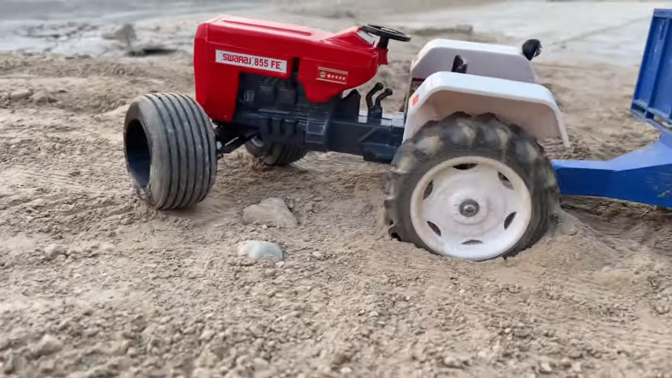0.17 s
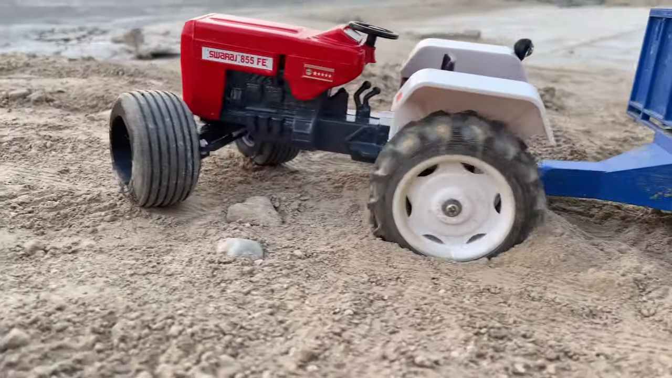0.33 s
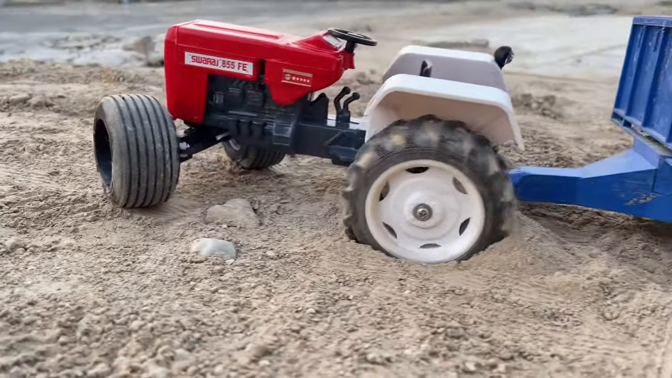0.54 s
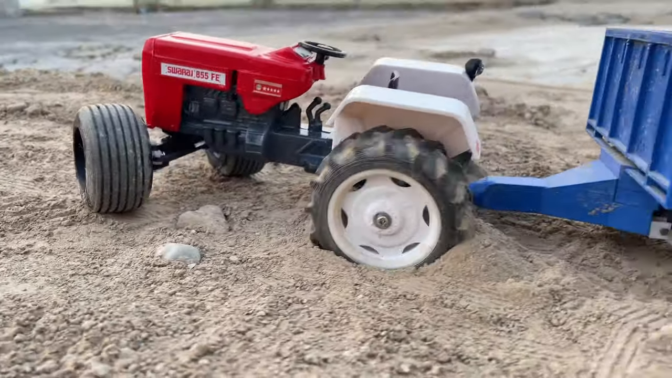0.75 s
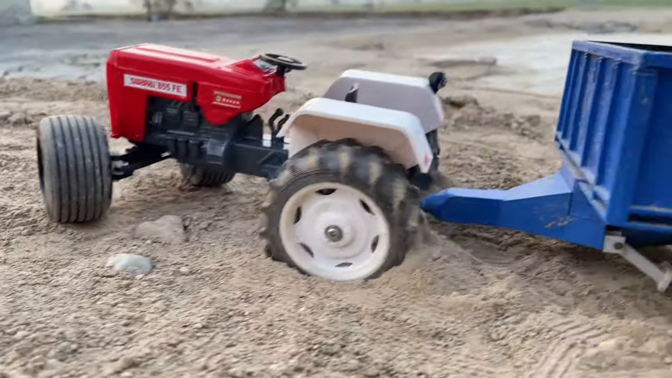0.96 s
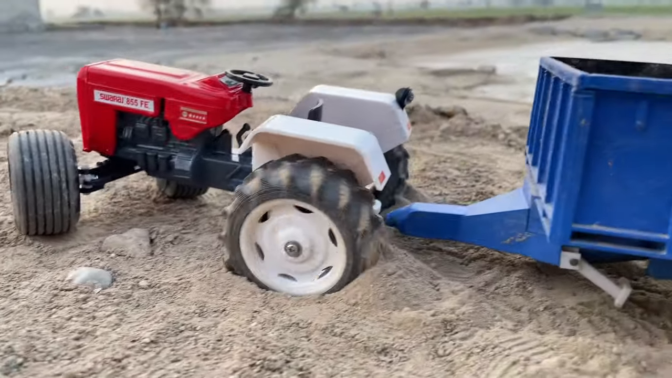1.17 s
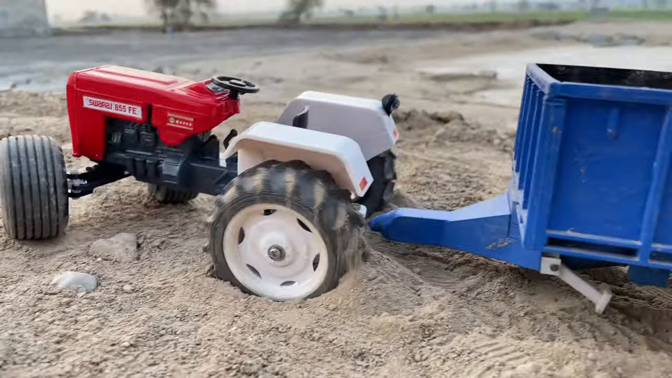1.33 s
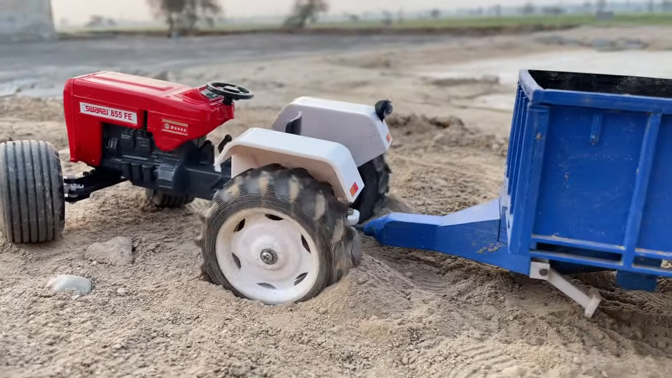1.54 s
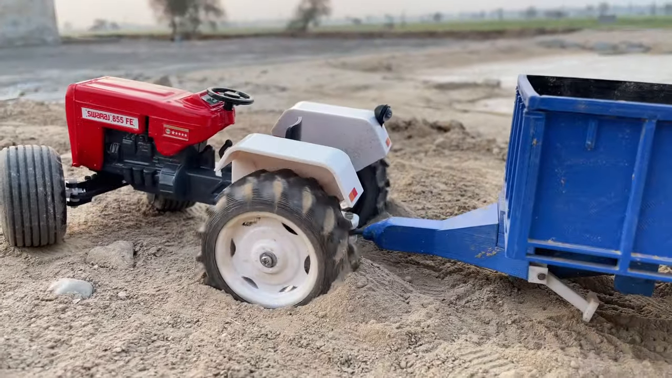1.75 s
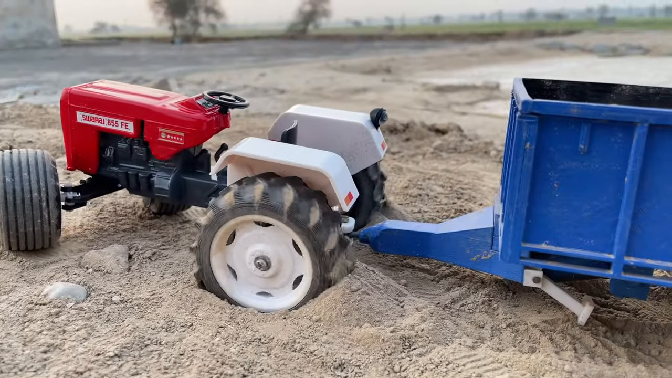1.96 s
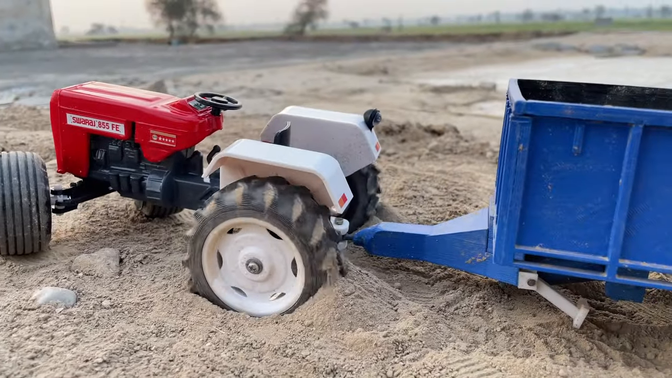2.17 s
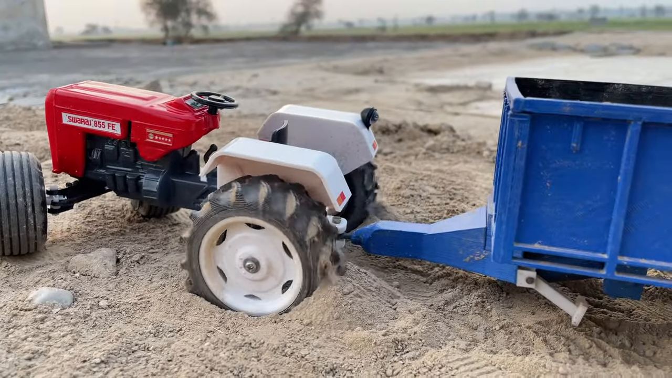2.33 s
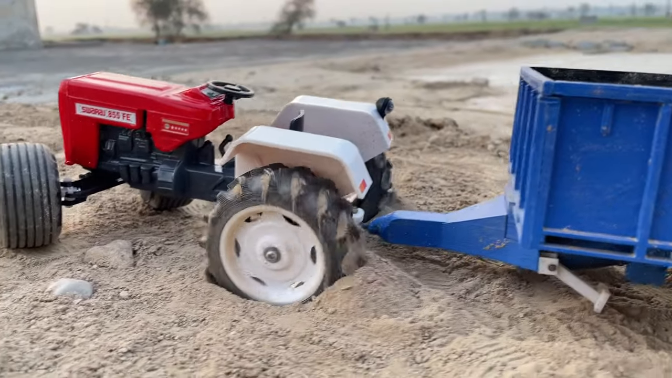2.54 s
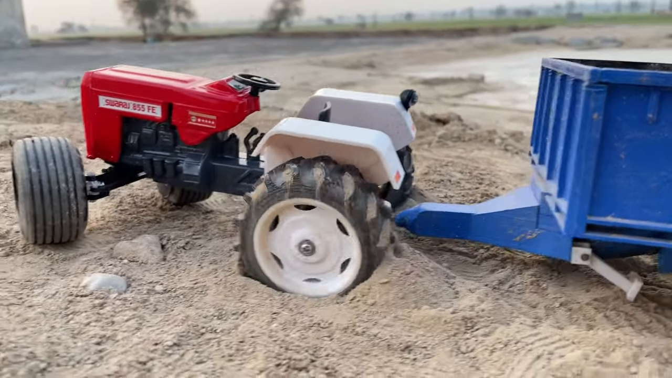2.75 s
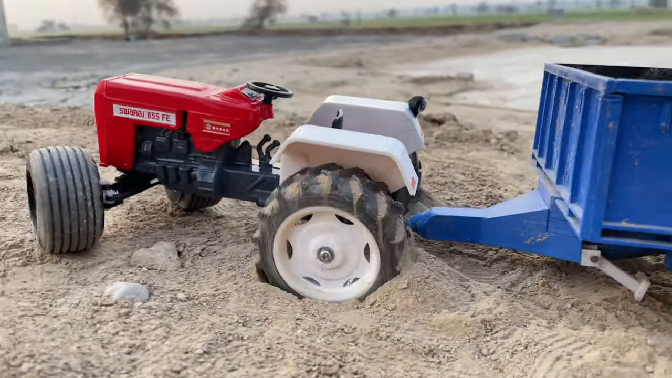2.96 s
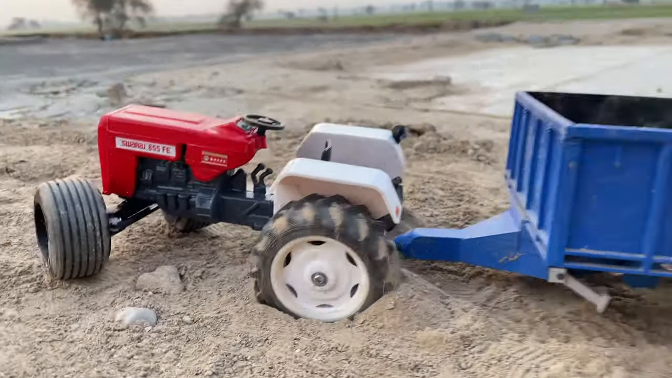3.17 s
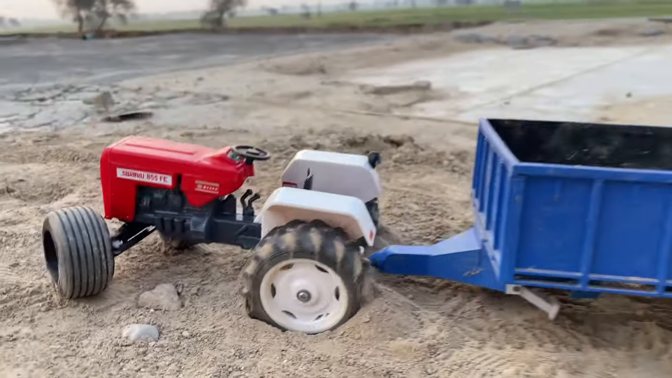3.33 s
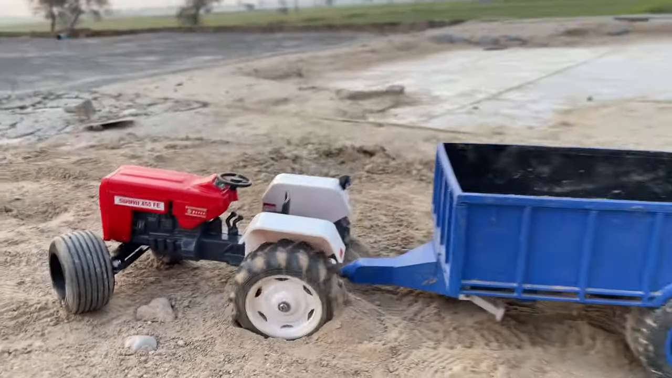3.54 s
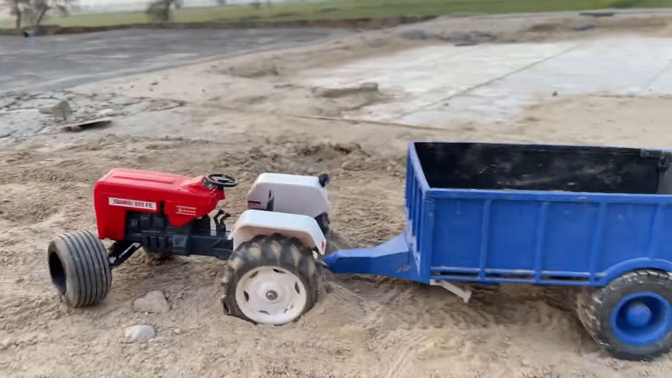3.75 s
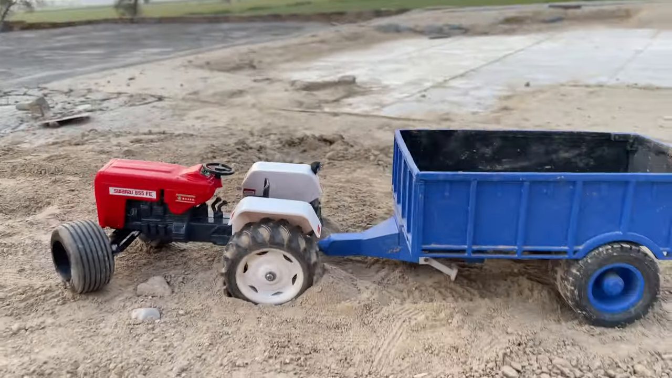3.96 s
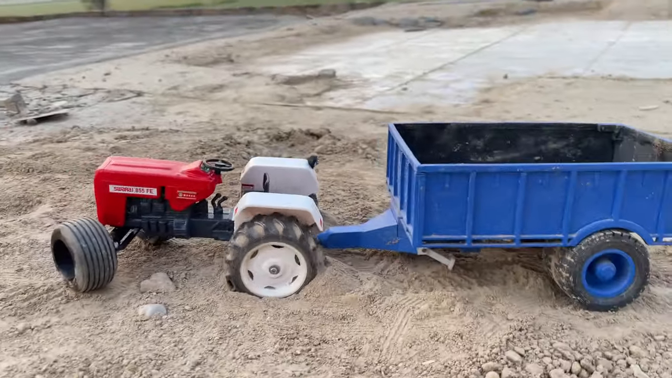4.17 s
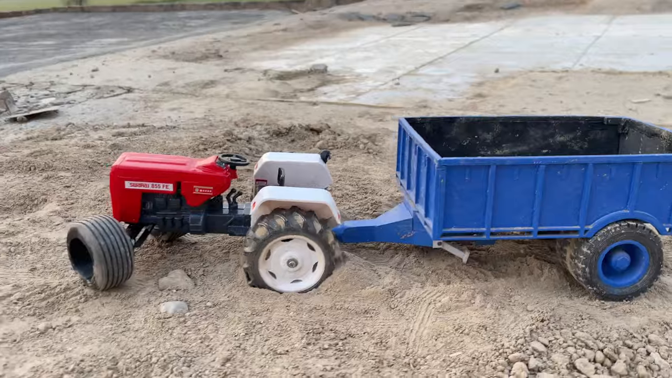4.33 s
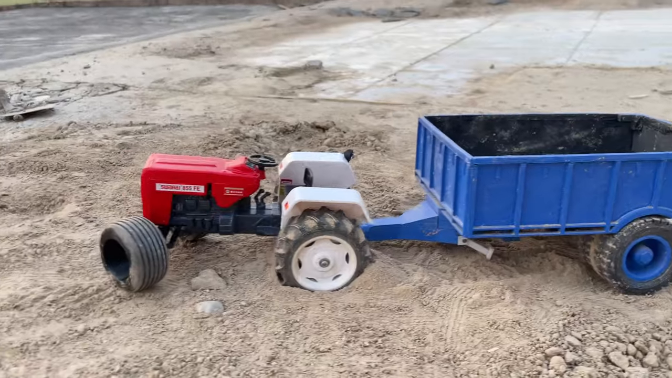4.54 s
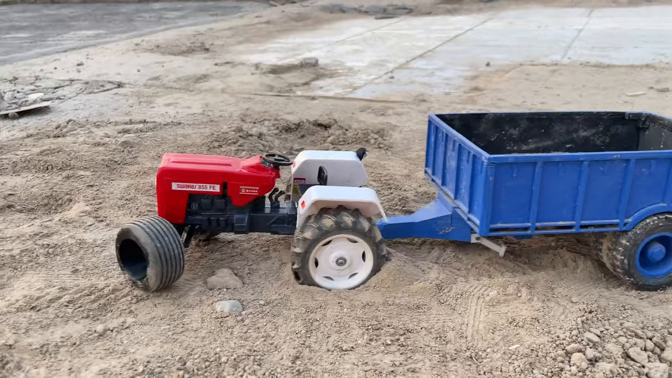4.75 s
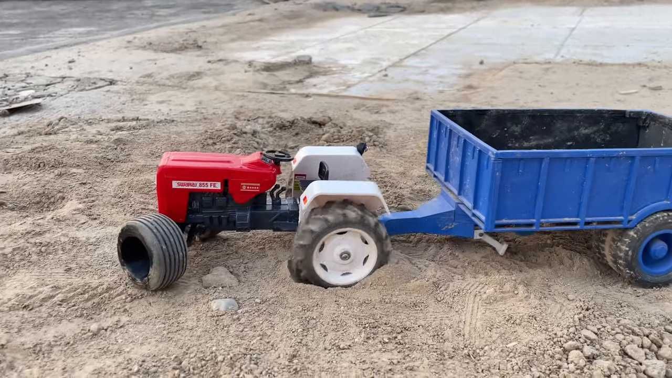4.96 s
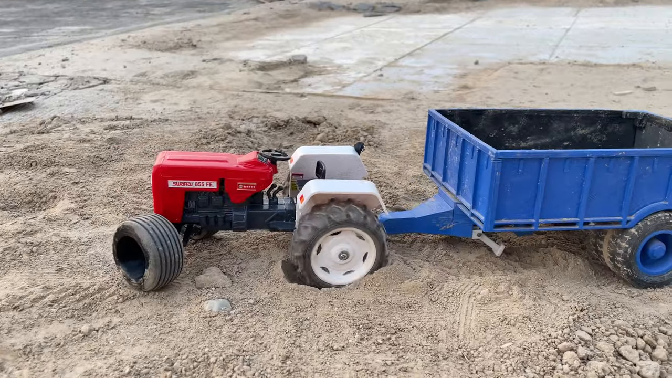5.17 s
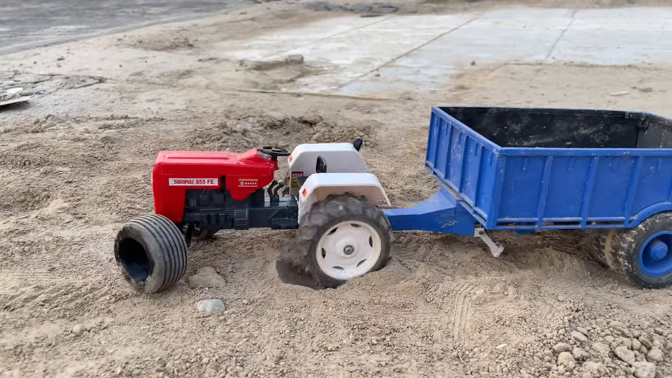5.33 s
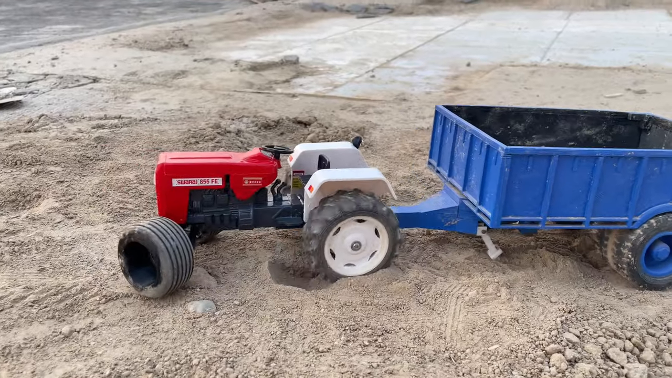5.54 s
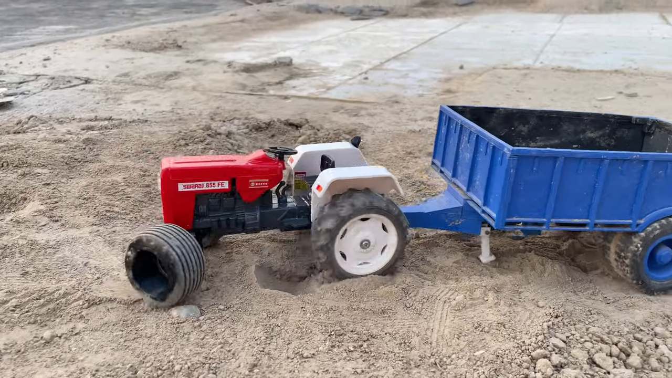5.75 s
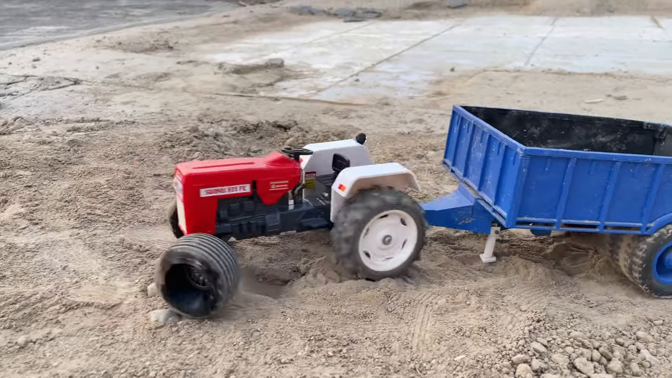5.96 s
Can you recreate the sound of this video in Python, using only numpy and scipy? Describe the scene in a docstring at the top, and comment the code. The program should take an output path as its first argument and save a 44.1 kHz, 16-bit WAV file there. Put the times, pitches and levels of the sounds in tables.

```python
"""Over open ground with light wind rumble, one gust, a far engine's hum and field noise, a toy tractor pulls in sand.
Its motor and plastic gears grind as noise swelling at each tooth, snagging a dozen times a second, with grit pings.
It bogs down, stops with a clack of gear play, clicks over and restarts faster, with a clearer whine of sine tones.
Resonances of shell, gears and chassis colour the toy; two ports hear it with different phase."""
import sys
import numpy as np
from scipy import signal
from scipy.fft import rfft, irfft, next_fast_len
from scipy.io import wavfile

SR = 44100
rng = np.random.default_rng(int(sys.argv[2]) if len(sys.argv) > 2 else 0)


def transcribe(signal):
    """Save signal, clipped to [-1, 1], as a 16-bit WAV file at the path in sys.argv[1]."""
    frames = np.atleast_2d(signal).T
    limited = np.clip(frames, -1, 1)
    pcm = np.round(limited * 32767).astype(np.int16)
    wavfile.write(sys.argv[1], SR, pcm)


N = 268877
T = np.arange(N) / SR
SIZE = next_fast_len(N + SR // 4)  # room for ringing tails
HZ = np.maximum(np.fft.rfftfreq(SIZE, 1 / SR), 1)
ON_S = 4.846  # motor power returns
AGAIN = T >= ON_S


def from_db(db):
    """Gain of a level in dB."""
    return 10 ** (np.asarray(db) / 20)


def rms_one(x):
    """Scaled to rms 1."""
    return x / np.sqrt(np.mean(x ** 2) + 1e-20)


def in_time(rows):
    """Columns of a curve at every sample."""
    s, *columns = np.transpose(rows)
    return [np.interp(T, s, column) for column in columns]


def on_hz(rows):
    """Columns of a spectrum table at every FFT bin, joined along log frequency."""
    hz, *columns = np.transpose(rows)
    return [np.interp(np.log(HZ), np.log(hz), column) for column in columns]


def drift(rate_hz):
    """Slow random wander of rms 1: noise through two equal one-pole lowpasses, settled for a second."""
    pole = np.exp(-2 * np.pi * rate_hz / SR)
    wander = signal.lfilter([1], [1, -2 * pole, pole * pole], rng.standard_normal(N + SR))
    return rms_one(wander[SR:])


def bumps(rows, width_s):
    """Sum of smooth Gaussian bumps, one per (time, height) row."""
    s, height = np.transpose(rows)
    marks = np.bincount(np.clip(s * SR, 0, N - 1).astype(int), height, N)
    t = np.arange(-SR // 10, SR // 10 + 1) / SR
    return signal.fftconvolve(marks, np.exp(-.5 * (t / width_s) ** 2), "same")


def resonances(hz, width_hz, db):
    """Parallel causal resonances with alternating signs; white noise of rms 1 leaves with rms 1."""
    total = 0
    for k, (f, w, d) in enumerate(zip(hz, width_hz, db)):
        total = total + (-1) ** k * from_db(d) * 1j * HZ * w / (f * f - HZ ** 2 + 1j * HZ * w)
    return total / np.sqrt(np.mean(np.abs(total) ** 2))


def coloured(spectrum, alike):
    """Stereo noise of a spectrum, rms 1; alike sets how much the two sides share."""
    noise = rfft(rng.standard_normal((2, SIZE))) * from_db(on_hz(spectrum)[0])
    mid, side = irfft(noise, SIZE)[:, :N]
    alike = np.clip(alike, 0, 1)
    return rms_one(np.sqrt(1 + alike) * mid + np.sqrt(1 - alike) * side * np.array([[1], [-1]]))


def field():
    """Far open-air noise, steady and wide."""
    # field colour: (frequency [Hz], relative density [dB per Hz])
    field_colour = [(88, -20), (150, -2), (225, -7.5), (260, -5), (336, -7), (476, -7.5), (713, -17),
                    (8630, -40), (12000, -60), (15600, -98), (22000, -120)]
    return from_db(-51) * coloured(field_colour, alike=0.34)


def far_engine():
    """Hum at multiples of a far engine's firing rate; pitch and levels wander slowly."""
    firing_hz = 24.6
    # steady tones: (multiple of firing rate, middle level [dB])
    steady = [(2, -48.5), (3, -52), (5, -54)]
    # fourth multiple, coming and going on the wind: (time [s], middle level [dB])
    fourth = [(0, -53), (.4, -38), (.7, -46), (.95, -52), (1.3, -38), (1.8, -48), (2.15, -58),
              (2.55, -39.5), (3.4, -47), (3.8, -56), (5.4, -60), (5.7, -44), (6.1, -43)]
    turns = np.cumsum(firing_hz + .25 * drift(3.45)) / SR
    hum = 0
    for k, db in [*steady, (4, in_time(fourth)[0])]:
        hum = hum + from_db(db + 2.3 * drift(3.3)) * np.sin(2 * np.pi * round(k) * turns)
    return hum


def wind():
    """Lumpy low rumble of moving air, with one deep gust."""
    # rumble: (time [s], middle level [dB])
    rumble_level = [(0, -43.5), (.35, -39), (.8, -37), (1.2, -40), (1.6, -38), (1.95, -40.5), (2.7, -38),
                    (3.5, -42), (4.7, -45), (5.5, -46.5), (6.1, -46)]
    # rumble colour: (frequency [Hz], relative density [dB per Hz])
    rumble_colour = [(12, -43), (20, -56), (45, 0), (87, -0.5), (109, -1.5), (156, -13.5), (211, -16.5),
                     (400, -22), (520, -85), (880, -120)]
    # gust colour: (frequency [Hz], relative density [dB per Hz])
    gust_colour = [(25, -40), (45, -2), (70, 0), (90, -14), (140, -50)]
    gust_s, gust_db, gust_width_s, lumps_db = 1.044, -31, 0.059, 1.5
    rumble_db = in_time(rumble_level)[0] + lumps_db * drift(3.6)
    rumble = from_db(rumble_db) * coloured(rumble_colour, alike=.9)
    gust_shape = from_db(gust_db) * np.exp(-.5 * ((T - gust_s) / gust_width_s) ** 2)
    return rumble + gust_shape * coloured([(1, -120), *gust_colour, (400, -120)], alike=.9)


def air():
    """Everything around the toy: wind, far engine and open field."""
    return wind() + far_engine() + field()


def bursts(rows, first_db):
    """Each contact is a firm click, then decaying noise chatter; spectra of three draws."""
    chatter, first = np.zeros(N), np.zeros(N)
    for s, db, ms in rows:
        chatter += from_db(db) * (T >= s) * np.exp(-np.maximum(T - s, 0) * 1000 / ms)
        first[round(s * SR)] = from_db(db + first_db) / ms  # firmer in short bursts
    draws = chatter * rng.standard_normal((3, N))
    draws[0] += first
    return rfft(draws, SIZE)


def clacks():
    """Gear play knocks the whole toy; grit pings some upper modes only."""
    # grit caught in the gears: (time [s], drive level [dB], decay [ms])
    grit = [(0.0775, -24, 1.3), (1.5377, -38, 1.5), (1.8105, -33, 1.2), (2.369, -32, 1.5),
            (3.0785, -31, 1.2), (3.092, -33, 2), (3.104, -34, 1.5), (3.268, -34, 1.5), (3.402, -31, 1.2),
            (3.7993, -30, 1.26)]
    # gear play taken up at the stop: (time [s], drive level [dB], decay [ms])
    stop_contacts = [(4.4981, -20, 2), (4.5003, -23, 3), (4.5234, -43, 4), (4.5424, -52, 5)]
    # gear play taken up at the switch-over: (time [s], drive level [dB], decay [ms])
    switch_contacts = [(4.7349, -30, 1), (4.7358, -16, 1.6), (4.7385, -31, 2.5), (4.7567, -53, 9),
                       (4.7695, -47, 5), (4.8466, -40, 1.1)]
    # what the clacks ring: (frequency [Hz], width [Hz], stop level [dB], switch-over level [dB])
    clack_modes = [(830, 130, -2, -6), (1050, 250, 2, -18), (1590, 380, -5, 4), (2400, 450, -6, -13),
                   (2920, 300, -6, -15), (3450, 400, -4, -10), (4220, 320, -8, -13), (4850, 400, -7, -19),
                   (5800, 500, -10, -23), (6600, 500, -11, -27), (7600, 800, -11, -27),
                   (9700, 2000, -18, -26), (12500, 1200, -18, -28)]
    low_hz = 600  # too small a body to thud below this
    hz, width_hz, stop_db, switch_db = np.transpose(clack_modes)
    upper = slice(3, 10)
    knocks = bursts(stop_contacts, first_db=19) * resonances(hz, width_hz, stop_db)
    knocks += bursts(switch_contacts, first_db=27) * resonances(hz, width_hz, switch_db)
    knocks += bursts(grit, first_db=11) * resonances(hz[upper], width_hz[upper], stop_db[upper])
    low_cut = signal.butter(3, low_hz, "high", fs=SR, output="sos")
    return knocks * signal.sosfreqz(low_cut, HZ, fs=SR)[1]


def snags():
    """Drop in dB before each part's share: a smooth dip at each lug, deeper at the hard snags."""
    # tyre lugs biting the sand in the first pull, one snag each: (time [s], lugs passed [count])
    lug_passes = [(.052, 0), (.54, 6), (.969, 11), (1.272, 15), (1.738, 21), (2.464, 30), (2.963, 36),
                  (3.494, 42), (3.705, 45), (4.095, 50)]
    # hard snags: (time [s], further drop [dB])
    hard_snags = [(.052, 3), (0.318, 3), (0.457, 3), (0.711, 3.5), (0.967, 3.5), (1.207, 1.5), (1.352, 2),
                  (1.739, 3), (1.98, 3), (2.315, 3), (2.628, 5), (2.716, 2), (2.963, 2.5), (3.229, 3),
                  (3.624, 2), (4.094, 2), (5.261, 2.5)]
    drop_db, spread_db, jitter_s, snag_s = 3, 1.16, .004, .014
    s, passed = np.transpose(lug_passes)
    lug = np.arange(passed[-1] + 1)
    chance = rng.standard_normal((len(lug), 2))
    lug_s = np.interp(lug, passed, s) + jitter_s * chance[:, 0]
    lug_db = drop_db + spread_db * chance[:, 1]
    return bumps([*zip(lug_s, lug_db), *hard_snags], snag_s)


def stall():
    """Depth 0-1 of the bogging just before the stop: sinks quickly, recovers more slowly."""
    deepest_s, sink_s, recover_s = 4.285, .03, .08
    return np.exp(-.5 * ((T - deepest_s) / np.where(T < deepest_s, sink_s, recover_s)) ** 2)


def power():
    """Motor gain: full, a fast run-down and fainter coasting after the cut, then on with a surge."""
    off_s, run_down_s, coast_db, coast_s = 4.503, 0.006, -20, 0.028
    on_rise_s, surge_db, surge_s = 0.0019, 4, 0.03
    off, on = np.maximum(T - off_s, 0), np.maximum(T - ON_S, 0)
    dying = np.exp(-off / run_down_s) + from_db(coast_db) * np.exp(-off / coast_s)
    dying /= 1 + from_db(coast_db)
    return dying + (1 - np.exp(-on / on_rise_s)) * from_db(surge_db * np.exp(-on / surge_s))


def shell_swells():
    """Rise in dB where the shell briefly rings up."""
    # swells: (time [s], rise [dB])
    ring_ups = [(.1, 4), (.166, 5), (.245, 5), (.85, 5), (1.18, 5), (1.47, 4), (1.7, 4), (2.1, 5),
                (3.73, 5), (4.055, 8), (4.077, 4), (4.206, 7), (4.451, 9), (5.235, 7)]
    return bumps(ring_ups, .005)


def gear_turns(pull_per_s, restart_per_s, bog, drop):
    """Tooth contacts passed: the bogging and each snag slow the gears, which then pick up again."""
    bog_slowing, slowing_per_db, recovery_s = .36, .024, .02
    pull_per_s = pull_per_s * (1 - bog_slowing * bog) * (1 + .02 * drift(40))
    speed = np.where(AGAIN, restart_per_s, pull_per_s)
    keep = np.exp(-1 / (recovery_s * SR))
    held = signal.lfilter([1 - keep], [1, -keep], drop)
    held -= held[~AGAIN].mean() * ~AGAIN  # the first pull keeps its mean speed
    unsteady = .014 * drift(50) + .008 * drift(9)
    return np.cumsum(speed * (1 - slowing_per_db * held + unsteady)) / SR


def meshing(turns, sharp, knock):
    """Three unrelated draws of friction noise swelling at each tooth; the first adds one uneven knock a tooth."""
    gate = np.exp(sharp * (np.cos(2 * np.pi * turns) - 1))
    teeth = np.diff(np.floor(turns + .5), prepend=0) > 0
    draws = rms_one(gate * rng.standard_normal((3, N)))
    draws[0] += knock * rms_one(teeth * from_db(3 * rng.standard_normal(N)))
    return draws


def gear_whine(turns, restart_per_s, swell_db):
    """The mesh sings at multiples of the tooth rate, with wandering level and blurred phase."""
    # multiples 1-5: (base level [dB], share of the swells [ratio], phase blur [rad])
    multiples = [(-64, .3, .9), (-45, .5, 1.2), (-36, 1, .7), (-52, .4, .8), (-56, .4, 1.2)]
    # shell and gearbox lift any multiple in their range: (lift [dB], centre [Hz], width [Hz])
    lifts = [(12, 1490, 150), (7, 1880, 170)]
    whine = 0
    for k, (db, share, blur) in enumerate(multiples, 1):
        level_db = db + share * swell_db + 3.9 * drift(42.9)
        for up_db, hz, width_hz in lifts:
            level_db = level_db + up_db * np.exp(-((k * restart_per_s - hz) / width_hz) ** 2)
        whine = whine + from_db(level_db) * np.sin(2 * np.pi * k * turns + blur * drift(35))
    return whine


def motor():
    """Spectra of three draws: teeth excite each part of the toy; on the restart the mesh also sings."""
    # first pull: (time [s], tooth contacts before slowing [per s], shell level [dB], sizzle level [dB])
    pull = [(0, 294, -30, -34.5), (.1, 340, -30, -34.5), (.3, 321, -29, -36.5), (.5, 317, -31, -34),
            (.75, 300, -32, -37.5), (1.05, 338, -30.5, -35.5), (1.3, 338, -30.5, -30.5),
            (1.55, 360, -31.5, -34), (1.8, 348, -30, -32.5), (2.05, 314, -31.5, -36), (2.42, 333, -32, -33),
            (2.65, 318, -32, -34.5), (3.05, 296, -34, -38.5), (3.3, 296, -30.5, -38),
            (3.6, 345, -32.5, -33), (3.85, 338, -33.5, -38.5), (4.2, 359, -32.5, -39.5),
            (4.5, 300, -32, -38)]
    # the listening angle moves in the first pull:
    # (time [s], gearbox level [dB], idler level [dB], chassis level [dB])
    angle = [(0, -30.5, -58, -39.5), (.35, -30.5, -47, -39), (.55, -32, -50, -38.5),
             (0.851, -32, -46.5, -39), (1.301, -34.5, -39.5, -37.5), (1.998, -35.5, -41.5, -40.5),
             (2.42, -33.5, -39.5, -38), (2.9, -30, -46, -38.5), (3.25, -36.5, -48, -39),
             (3.55, -38.5, -44.5, -38.5), (3.899, -39, -56, -41.5), (4.502, -37, -48, -39)]
    # loss at the deepest bogging of shell, gearbox, idler, chassis, sizzle: (drop [dB])
    bog_loss = [6.9, 8.5, 7.4, 6.5, 12.8]
    # restart speed: (time [s], tooth contacts before slowing [per s])
    restart_speed = [(4.85, 545), (4.92, 535), (5.0, 520), (5.1, 506), (5.2, 486), (5.27, 486), (5.35, 480),
                     (5.46, 480), (5.6, 494), (5.75, 486), (5.87, 502), (5.94, 585), (6.0, 625), (6.1, 645)]
    # restart: (time [s], whine swell [dB], shell level [dB], sizzle level [dB])
    restart_levels = [(4.86, -11, -37, -39.5), (4.89, -8, -28, -31.5), (4.98, 5.5, -34, -33.5),
                      (5.09, -0.5, -30.5, -33.5), (5.27, -3.5, -29.5, -32.5), (5.42, 4.5, -29, -31),
                      (5.6, 6.5, -29.5, -31.5), (5.85, 5.5, -28.5, -31.5), (5.94, -6, -27.5, -30.5),
                      (6.1, 3, -24, -28)]
    # restart levels of gearbox, idler and chassis, after spin-up;
    # the gearbox holds steady, the other two rise slightly with speed:
    # (level at the mean speed [dB], slope [dB per 1% of speed])
    restart_parts = [(-33.5, 0), (-47.5, 0.1), (-37.5, .03)]
    # shell resonances: (frequency [Hz], width [Hz], first pull [dB], restart [dB])
    shell = [(1345.4, 100.4, 0, 2), (1443.5, 122, 2, 3.5)]
    # gearbox resonances: (frequency [Hz], width [Hz], first pull [dB], restart [dB])
    gearbox = [(1726, 97, -3.5, -6.5), (1807, 51, -3.5, -1.5), (1922, 70, 0.5, -4), (2114, 85, -3.5, -9.5),
               (2336, 122, -8, -16)]
    # idler gear resonance: (frequency [Hz], width [Hz], first pull [dB], restart [dB])
    idler = [(2760, 140, 0, 0)]
    # chassis resonances: (frequency [Hz], width [Hz], first pull [dB], restart [dB])
    chassis = [(567, 240, -1, -16.5), (828, 155, 0.5, -12.5), (1185, 330, 2, -5.5), (3102, 23, 2, 1),
               (3190, 92, -8.5, -11), (3560, 121, 3.5, 2), (3742, 147, -0.5, -1), (4114, 194, 2.5, -2),
               (4580, 1060, -6, -10.5)]
    # ringing of brushes and pinion: (frequency [Hz], width [Hz], first pull [dB], restart [dB])
    sizzle = [(6570, 710, -17, -14.5), (7190, 140, -8, -5.5), (7900, 500, -7, -2), (8450, 500, -8, -1),
              (9000, 500, -6, -5), (9810, 1480, -14, -7), (10444, 355, -6.5, -3.5), (11430, 570, -22, -4.5),
              (11680, 520, -17.5, -4.5), (12580, 560, -17.5, -11.5)]
    # how teeth drive each part: (resonances, swell sharpness, knock share, snag share, flutter [dB])
    parts = [(shell, .4, .95, .2, 1.5), (gearbox, .4, .6, .2, 1.2), (idler, .4, .4, .2, 1.5),
             (chassis, .6, .35, .2, .9), (sizzle, 2.6, .9, 1.1, 1.8)]
    spin_up_s, top_hz = 0.02, 14000

    drop, bog, gain, ring_up_db = snags(), stall(), power(), shell_swells()
    pull_per_s, shell_db, sizzle_db = in_time(pull)
    pull_db = [shell_db + ring_up_db, *in_time(angle), sizzle_db]
    pull_db = [db - loss_db * bog for db, loss_db in zip(pull_db, bog_loss)]

    restart_per_s, = in_time(restart_speed)
    swell_db, shell_db, sizzle_db = in_time(restart_levels)
    faster_percent = 100 * (restart_per_s / restart_per_s[AGAIN].mean() - 1)
    spin_up_db = -10 * np.exp(-np.maximum(T - ON_S, 0) / spin_up_s)
    inner_db = [db + per_db * faster_percent + spin_up_db for db, per_db in restart_parts]
    restart_db = [shell_db + ring_up_db, *inner_db, sizzle_db]

    turns = gear_turns(pull_per_s, restart_per_s, bog, drop)
    out = 0
    for k, (modes, sharp, knock, snag_share, flutter_db) in enumerate(parts):
        level_db = flutter_db * drift(26.5) - snag_share * drop
        drive = meshing(turns, sharp, knock) * gain * from_db(level_db)
        hz, width_hz, pull_mode_db, restart_mode_db = np.transpose(modes)
        pulling = drive * from_db(pull_db[k]) * ~AGAIN
        restarting = drive * from_db(restart_db[k]) * AGAIN
        out = out + rfft(pulling, SIZE) * resonances(hz, width_hz, pull_mode_db)
        out = out + rfft(restarting, SIZE) * resonances(hz, width_hz, restart_mode_db)
    out[0] += rfft(gear_whine(turns, restart_per_s, swell_db) * gain * AGAIN, SIZE)
    top_cut = signal.cheby2(10, 45, top_hz, fs=SR, output="sos")
    return out * signal.sosfreqz(top_cut, HZ, fs=SR)[1]


def ports(spectra):
    """One draw reaches both ports with a phase turn; the other two reach one port each."""
    # how the ports hear the toy:
    # (frequency [Hz], right phase [rad], left minus right [dB], shared power [0-1])
    port_response = [(300, 0, 1, .7), (1000, -1.1, 3, .85), (1400, -1.6, 0, .95), (1700, -2.1, 4, .8),
                     (1950, -2.3, 1, .4), (2200, -3.3, -1.5, .55), (2800, -6.0, 4, .6), (3500, -6.2, 6, .6),
                     (4200, -6.4, 4, .88), (5000, -7.0, 3.5, .7), (5700, -5.2, 1.5, .65),
                     (6700, -5.3, 5, .82), (7500, -3.6, 1.5, .9), (8250, -np.pi, 0, 1),
                     (9050, -np.pi, 0, 1), (9600, -2.4, -.3, .85), (10500, -1.7, 0, .95),
                     (11500, -1.35, 0, .7), (12100, -.95, 0, .85), (12800, 0, 0, 1)]
    phase, balance_db, shared = on_hz(port_response)
    shared, side = np.clip(shared, 0, 1), np.array([[-.5], [.5]])
    both = np.sqrt(shared) * spectra[0] * np.exp(1j * phase * side)
    own = np.sqrt(1 - shared) * spectra[1:]
    return irfft((both + own) * from_db(-balance_db * side), SIZE)[:, :N]


def scene():
    """Toy through the ports, drifting a little between the sides, over the air."""
    # toy's place: (time [s], further left minus right [dB])
    place = [(0, 1.5), (.6, 0), (1.2, 0.4), (2.3, -1), (2.8, 0), (4.2, -.3), (5.2, -.6), (6.1, -1.2)]
    sides = from_db(in_time(place)[0] * np.array([[.5], [-.5]]))
    return ports(motor() + clacks()) * sides + air()


def record(dry):
    """A steep lowpass cuts the top, 70 dB down from its stopband edge."""
    cutoff_hz = 15848
    return signal.sosfilt(signal.cheby2(12, 70, cutoff_hz, fs=SR, output="sos"), dry)


dry = scene()
out = record(dry)
transcribe(out)
```